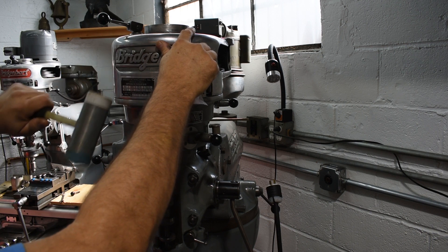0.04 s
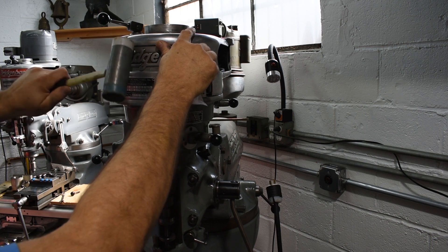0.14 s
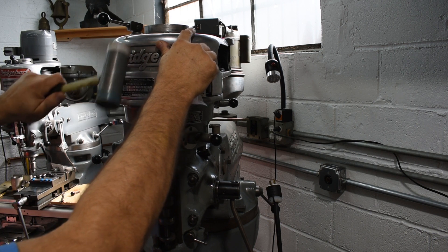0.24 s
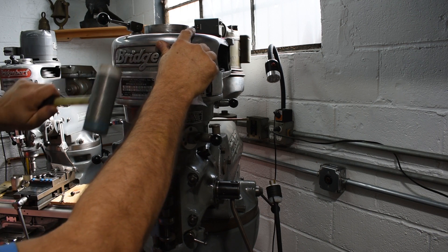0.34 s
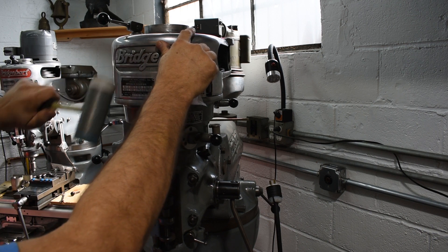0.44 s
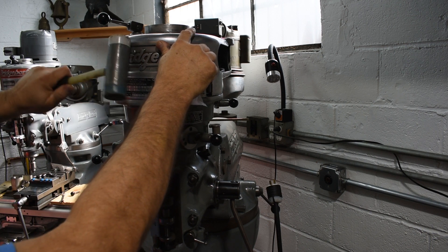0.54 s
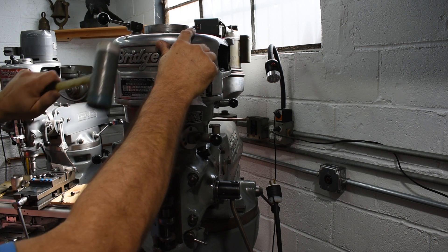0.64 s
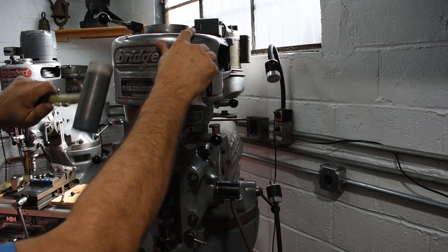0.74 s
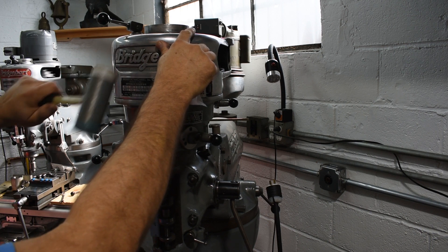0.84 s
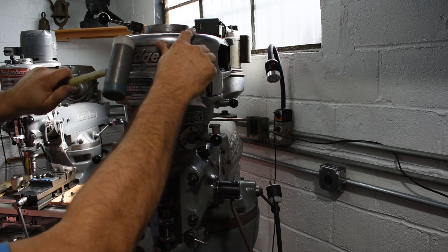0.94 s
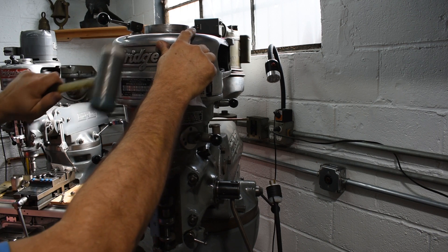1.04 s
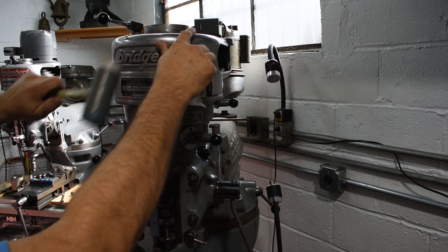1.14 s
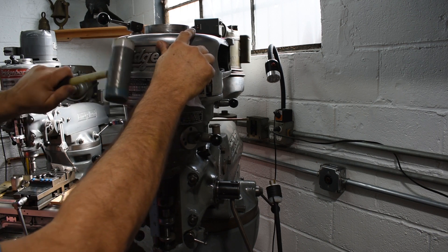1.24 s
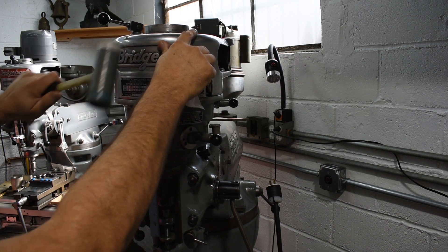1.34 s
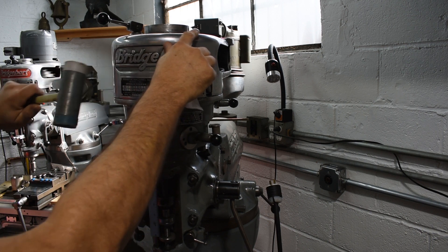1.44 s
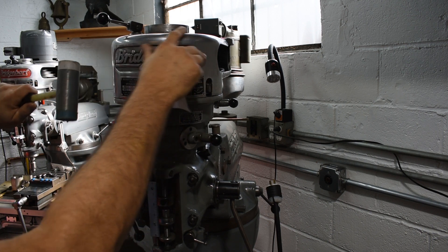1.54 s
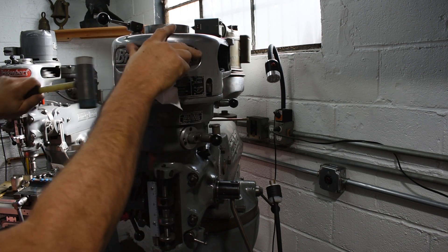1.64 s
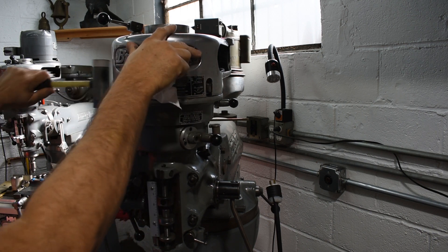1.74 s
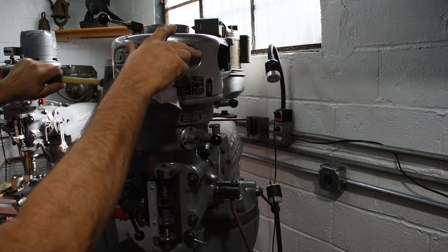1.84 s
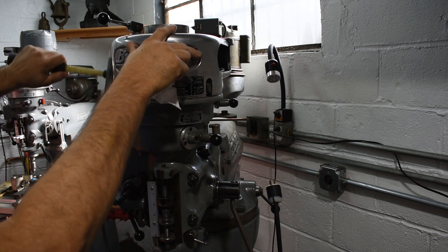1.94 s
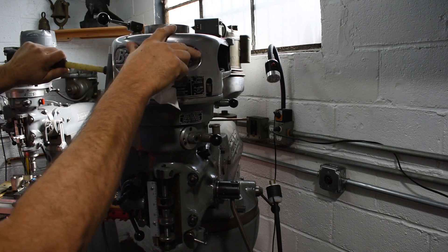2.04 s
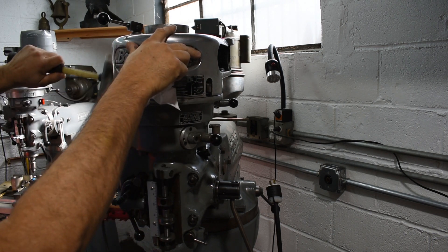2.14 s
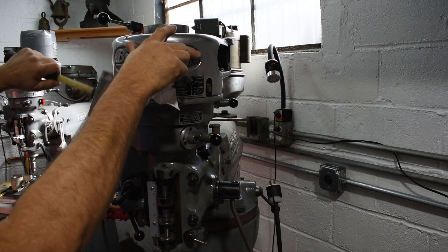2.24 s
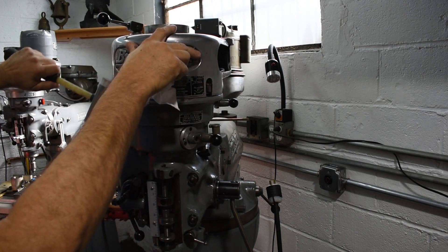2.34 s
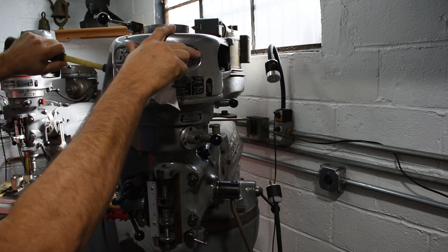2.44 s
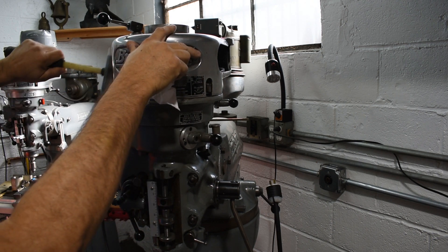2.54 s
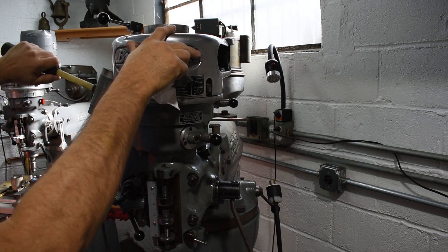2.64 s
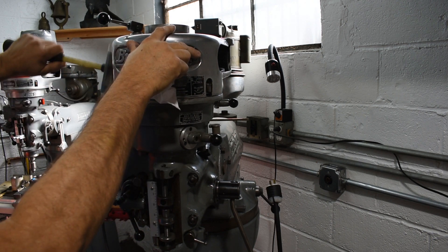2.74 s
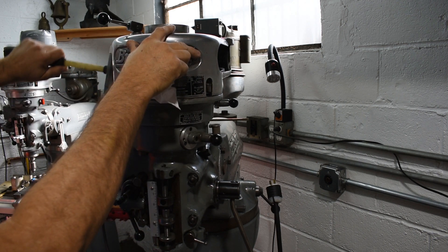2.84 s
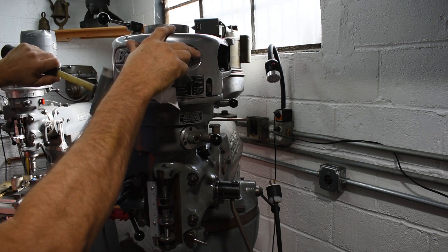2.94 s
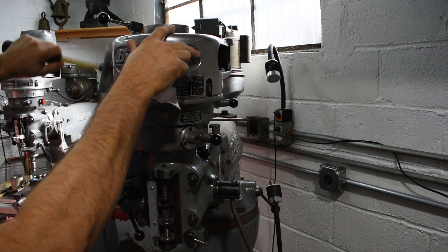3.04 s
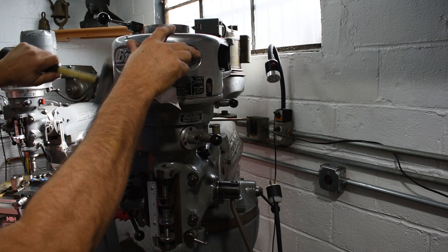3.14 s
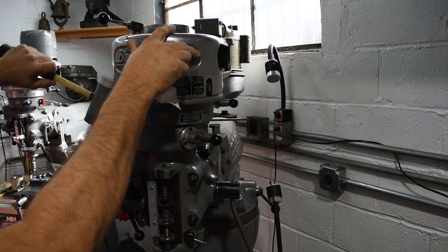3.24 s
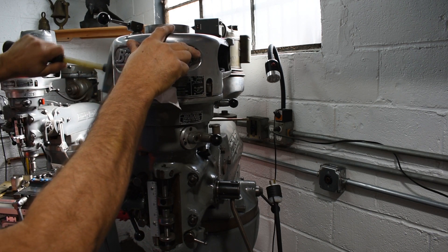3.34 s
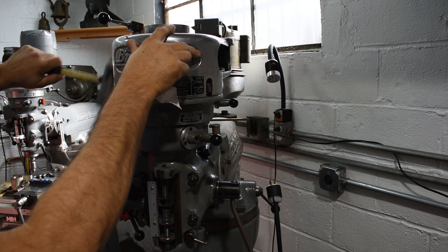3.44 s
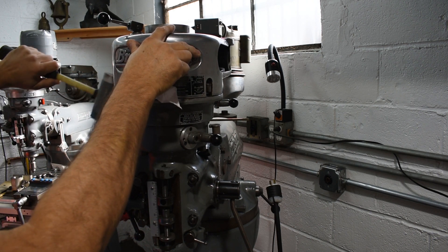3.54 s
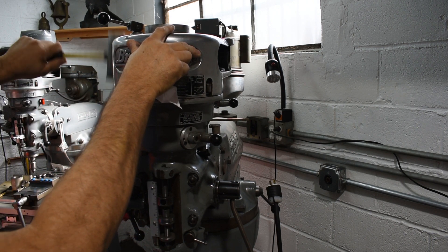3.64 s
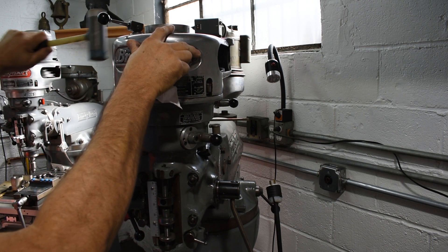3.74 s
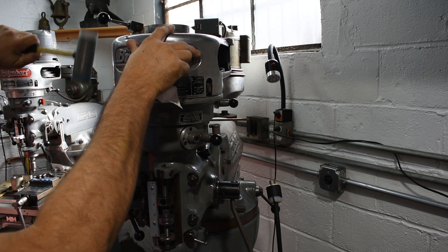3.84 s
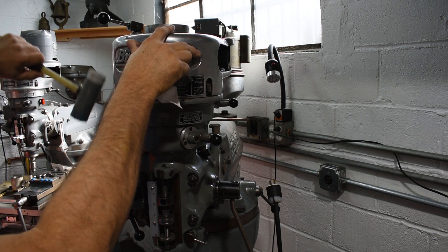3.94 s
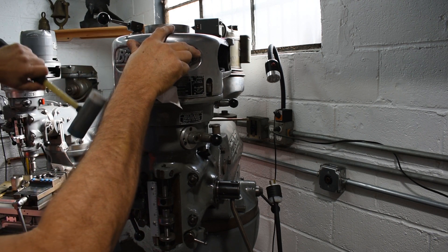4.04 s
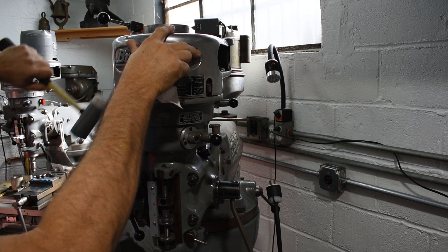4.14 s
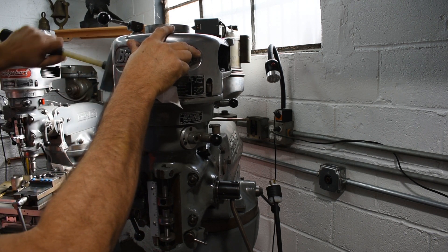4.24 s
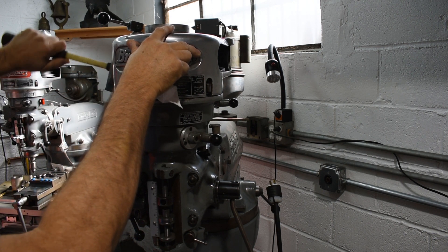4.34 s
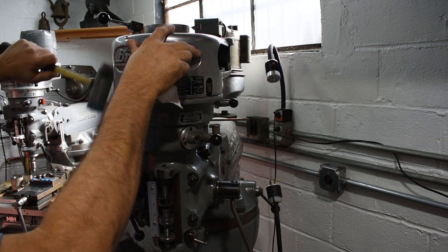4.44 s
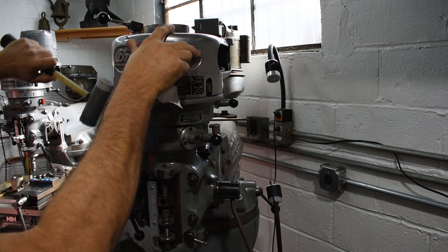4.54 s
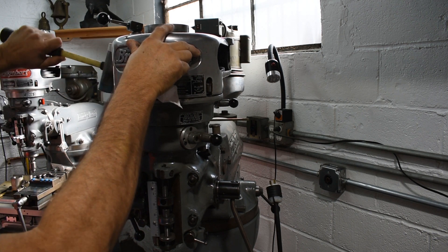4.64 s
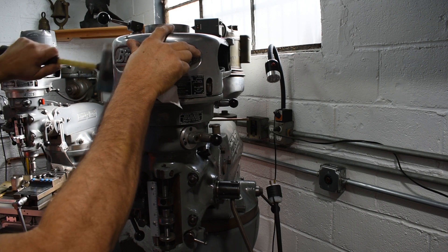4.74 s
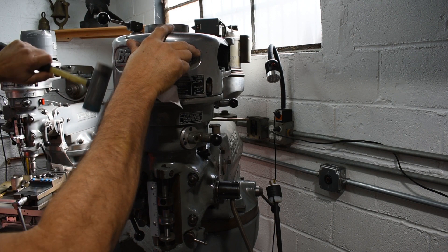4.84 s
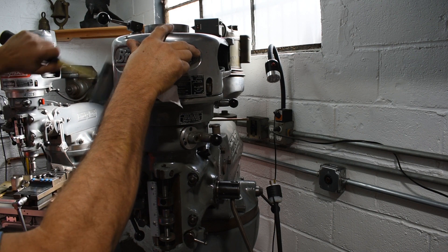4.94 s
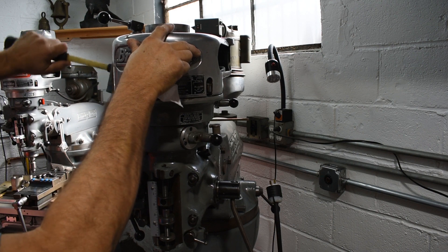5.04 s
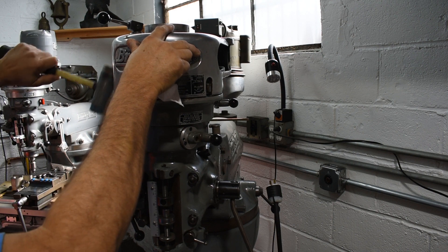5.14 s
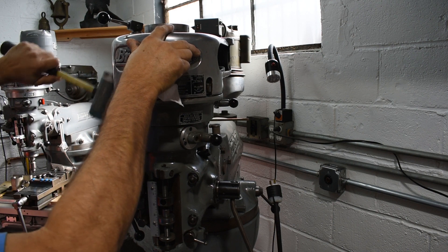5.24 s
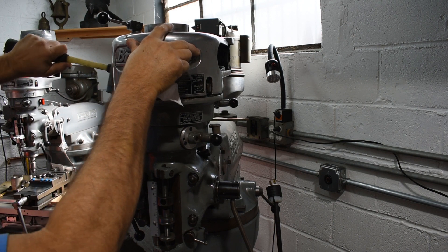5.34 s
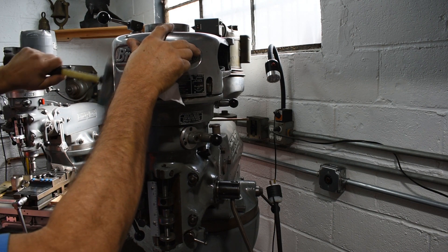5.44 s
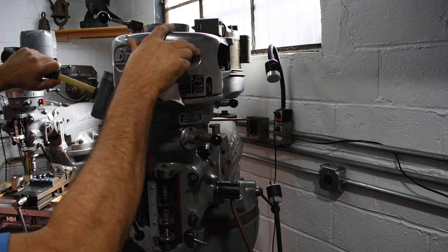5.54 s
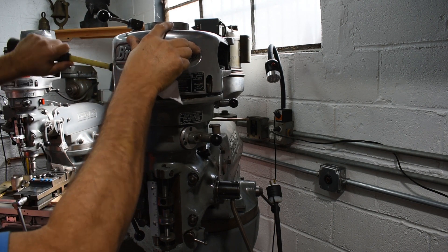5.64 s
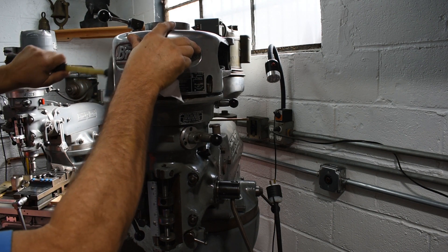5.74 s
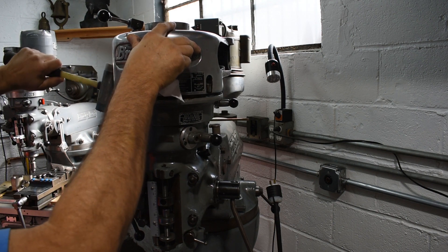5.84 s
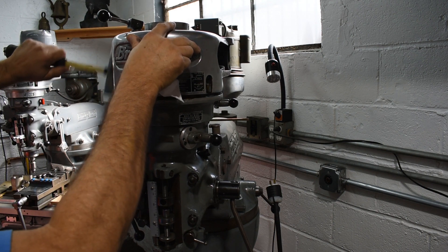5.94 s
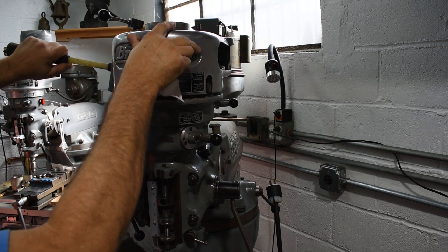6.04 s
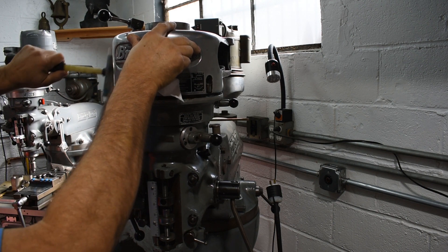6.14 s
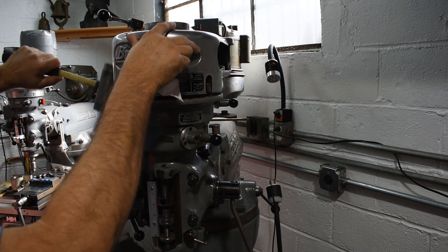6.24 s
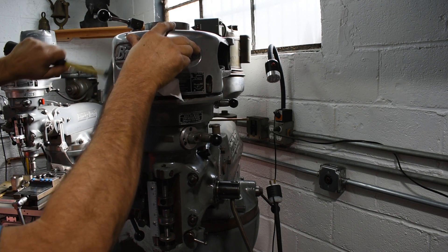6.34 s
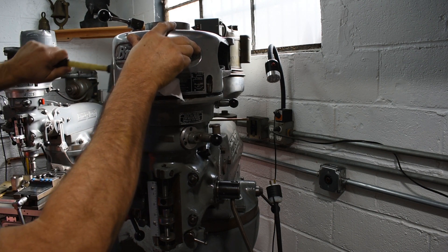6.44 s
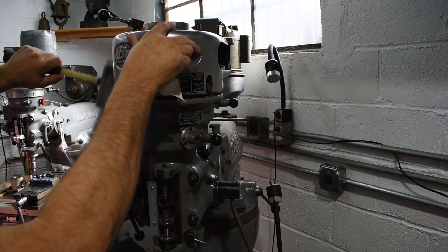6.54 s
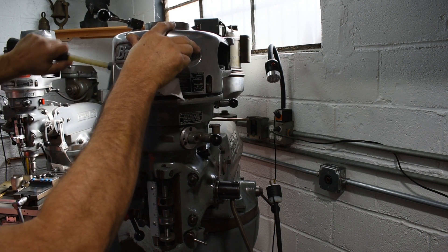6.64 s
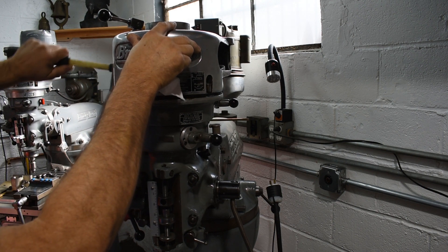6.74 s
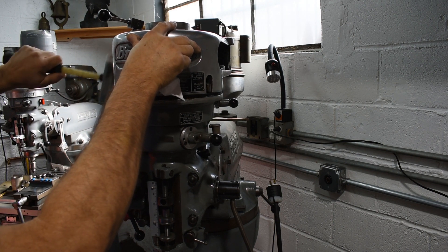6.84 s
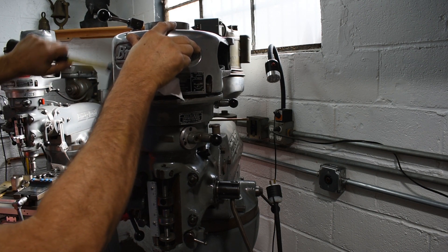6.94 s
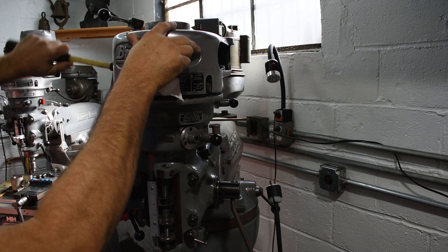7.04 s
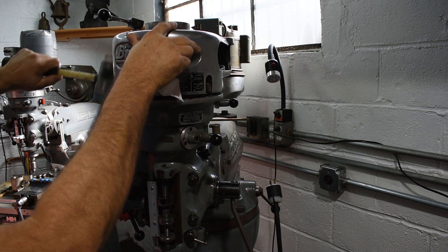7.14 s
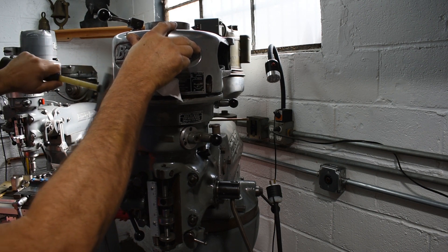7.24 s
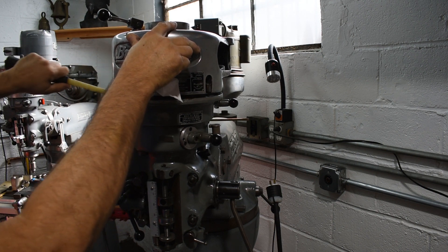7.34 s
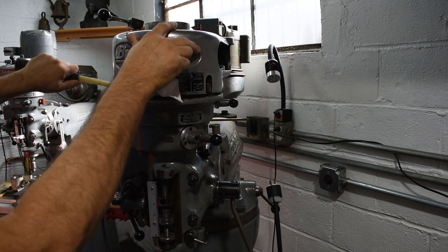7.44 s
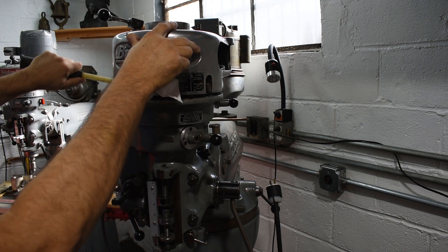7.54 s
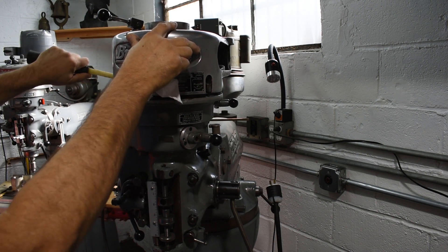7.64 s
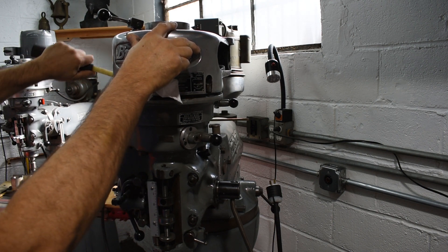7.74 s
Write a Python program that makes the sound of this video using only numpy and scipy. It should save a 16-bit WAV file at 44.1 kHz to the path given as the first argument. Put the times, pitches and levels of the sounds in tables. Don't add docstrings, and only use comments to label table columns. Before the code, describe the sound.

A rubber mallet strikes a loose cast-metal machine housing about eighteen times, with rattling double knocks growing harder and more metallic in a small workshop.

```python
import sys
import numpy as np
from scipy import signal
from scipy.io import wavfile
from scipy.ndimage import uniform_filter1d

SR = 44100
rng = np.random.default_rng(int(sys.argv[2]) if len(sys.argv) > 2 else 0)


def dump(signal):
    limited = np.clip(np.atleast_2d(signal).T, -1, 1)
    pcm = np.round(limited * 32767).astype(np.int16)
    wavfile.write(sys.argv[1], SR, pcm)


def nominal_scale(level):
    x = np.asarray(level, float) / 20
    return 10 ** x


N = 343980


def rms_one(x):
    return x / np.sqrt(np.mean(x ** 2) + 1e-20)


def at_hz(points, hz):
    table_hz, values = np.array(points).T
    return np.interp(np.log(hz), np.log(table_hz), values)


def filtered(x, order, hz, kind):
    return signal.sosfilt(signal.butter(order, hz, kind, fs=SR, output="sos"), x)


def band(x, low_hz, high_hz):
    return filtered(x, 2, [low_hz, min(high_hz, 0.45 * SR)], "band")


def ring(force, hz, t60):
    r, w = nominal_scale(-60 / (t60 * SR)), 2 * np.pi * hz / SR
    return signal.lfilter([0, np.sin(w)], [1, -2 * r * np.cos(w), r * r], force + 1e-18)


def plate(strikes, modes):
    clicks = np.zeros(N)
    for s, level_db in strikes:
        clicks[round(s * SR)] = nominal_scale(level_db)
    rings = sum(nominal_scale(level_db) * ring(clicks, hz, t60) for hz, level_db, t60 in modes)
    return band(rings, modes[0][0] / 1.69, modes[-1][0] * 1.19)


def drift(rate):
    r = np.exp(-80 * np.pi * rate / SR)
    slow = signal.lfilter([1], [1, -2 * r, r * r], rng.standard_normal(N // 40 + 2002))[2000:]
    return np.interp(np.arange(N) / 40, np.arange(len(slow)), rms_one(slow))


# [f/Hz, side level re mid/dB]
WIDTH = [(60, -22), (150, -26.5), (380, -24), (950, -22), (2380, -17), (5980, -12), (15000, -1.5)]


def stereo_bands(size, shape, extra_width_db):
    out = 0
    edges = 22 * 2 ** np.arange(0, 9.6, 0.5)
    white = rng.standard_normal((2, 2, size))
    for k, (low, high) in enumerate(zip(edges, edges[1:])):
        mid, side = band(white[k % 2], low, high)
        hz = np.sqrt(low * high)
        side = nominal_scale(at_hz(WIDTH, hz) + extra_width_db) * side
        out = out + shape(hz) * (mid + side * [[1], [-1]])
    return out


# [f/Hz, level per Hz/dB]
HUSH = [(55, -1.5), (90, -11), (150, 2), (300, -4), (1900, -10.5), (4000, -21.5), (8000, -34.5),
        (14000, -58)]
# [f/Hz, width/Hz, level/dB]
HUM = [(58, 12, -77), (144.7, 6.2, -63.5), (212.4, 5.5, -70), (357, 6, -64)]


def background():
    hush = stereo_bands(N, lambda hz: nominal_scale(at_hz(HUSH, hz) + drift(2.5)), extra_width_db=10.5)
    white = rng.standard_normal(N)
    tones = 0
    for hz, width, level_db in HUM:
        tones = tones + nominal_scale(level_db + 1.1 * drift(1.0)) * rms_one(ring(white, hz, 2.4 / width))
    return nominal_scale(-52.5) * rms_one(hush) + tones


# [t/s, knock level/dB, column thud re knock/dB, pin ring re knock/dB]
TAPS = [(0.194, -13, -8.5, -23), (0.5831, -11, -12.5, -17.5), (0.9575, -11.5, -13.5, -20.5),
        (1.2729, -13.5, -4, -22), (1.966, -3, -31, -60), (2.5016, -7, -11.5, -17.5),
        (2.824, -9.5, -10, -15.5), (3.1195, -8.5, -12, -14.5), (3.4092, -8, -18, -25.5),
        (4.3245, -6, -16, -25.5), (4.7194, -5, -18, -21), (5.0561, -1, -19, -21.5), (5.3888, -1, -37, -34),
        (5.7017, 1.5, -25.5, -47), (6.0591, -5.5, -22.5, -55), (6.4302, -3, -19, -46),
        (6.7433, -1.5, -22.5, -36), (7.0404, 2, -33, -51.5)]
# [t/s, knock level/dB]
REBOUNDS = [(0.2172, -16.5), (0.608, -10), (0.98, -15.5), (1.3093, -25), (2.0172, -13.5), (2.513, -12),
            (2.8485, -15.5), (3.148, -16), (3.421, -11), (3.4554, -7), (4.336, -6.5), (4.737, -7.5),
            (5.106, -4.5), (5.4389, -3.5), (5.7504, -6.5), (6.1, -18), (6.47, -16), (6.787, -3.5),
            (7.0902, -3), (7.1296, -12.5)]
# [thud/dB, body/dB, clank/dB, pin/dB]
REBOUND_MORE_DB = [1.5, -2.5, 2.5, 6]
# [t/s, knock level/dB, lever level/dB]
SWINGS = [
    (2.4574, -46, -51),
    (3.3715, -22, -50),
    (3.651, -27.5, -50),
    (3.69, -41, -47.5),
    (4.658, -18.5, -35),
    (5.382, -8, -47),
    (6.0453, -16, -37),
    (6.7143, -12, -15),
]
# [thud/dB, body/dB, clank/dB, pin/dB]
SWING_DB = [-13.5, -8.5, -15.5, -37]


def blows():
    s, knock_db, thud, pin_db = np.transpose(TAPS)
    boom = -3.5 + 0.26 * thud
    clank = np.minimum(-18.5 - 0.3 * thud, -10.5)
    colour = np.c_[thud, boom, clank, pin_db]
    back = np.array(REBOUNDS)
    back_colour = colour[np.searchsorted(s, back[:, 0]) - 1] + REBOUND_MORE_DB
    settle = back + [0.0441, -14.5]
    swings = np.array(SWINGS)[:, :2]
    rows = np.r_[np.c_[s, knock_db, colour],
                 np.c_[back, back_colour],
                 np.c_[settle, back_colour],
                 np.c_[swings, np.tile(SWING_DB, (len(swings), 1))]]
    return rows[np.argsort(rows[:, 0])]


SHUDDER_RISE_S, SHUDDER_FALL_S = 0.0052, 0.015


def shudder(times, levels_db):
    t = np.arange(round(0.12 * SR)) / SR
    shape = (1 - np.exp(-t / SHUDDER_RISE_S)) * np.exp(-t / SHUDDER_FALL_S)
    marks = np.zeros(N)
    lead_s = 0.0025
    marks[np.round((times - lead_s) * SR).astype(int)] = nominal_scale(levels_db)
    return signal.oaconvolve(marks, shape / np.sqrt(np.sum(shape ** 2)))[:N]


def part(levels_db, modes, rattle, spread_db):
    times = blows()[:, 0]
    latest = np.clip(np.searchsorted(times * SR, np.arange(N)) - 1, 0, None)
    grains = rng.standard_normal(N) * nominal_scale(3.1 * np.minimum(rng.exponential(1, N), 5))
    force = shudder(times, levels_db) * rms_one(grains)
    luck = rng.standard_normal((len(times), len(modes)))
    low_hz, high_hz, rattle_db = rattle
    rattle_gain = nominal_scale(rattle_db) * np.sqrt(SR * SR * SHUDDER_FALL_S / (high_hz - low_hz))
    out = rattle_gain * band(force, low_hz, high_hz)
    for k, (hz, level_db, t60) in enumerate(modes):
        out += ring(force * nominal_scale(level_db + spread_db * luck[latest, k]), hz, t60)
    return band(out, modes[0][0] / 1.76, modes[-1][0] * 1.244) / np.sqrt(len(modes))


# [f/Hz, level/dB, t60/s]
CASTING = [(886, 2.5, 0.034), (1007, -13, 0.061), (1054.5, -25, .08), (1240, -25, 0.18),
           (1300, -0.5, 0.184), (1388, -1, 0.09), (1482.5, 2, 0.039), (1562.3, 0.5, 0.075),
           (1635, -9, 0.18), (1749, -6.5, 0.029), (2027, -16.5, 0.058)]
# [low f/Hz, high f/Hz, level/dB]
CASTING_RATTLE = (826, 2590, 0)


def casting(knock_db):
    return part(knock_db - 3.5, CASTING, CASTING_RATTLE, spread_db=2.0)


# [f/Hz, level/dB, t60/s]
COLUMN = [(105, -9, .1), (135, -3, .16), (158, 2, .17), (200, -6, .1), (255, -5, .1)]
# [low f/Hz, high f/Hz, level/dB]
COLUMN_RATTLE = (94, 246, -5.5)


def column(thud_db):
    return part(thud_db + 0.5, COLUMN, COLUMN_RATTLE, spread_db=2.0)


# [f/Hz, level/dB, t60/s]
BODY = [(354, -2, 0.02), (428.2, -22.5, 0.13), (477, 1.5, 0.15), (521.5, 5.5, 0.0749), (587, 6.5, 0.0117),
        (679, 4, 0.092), (750.6, -1.5, 0.2032), (818, -5.5, 0.0751)]
# [low f/Hz, high f/Hz, level/dB]
BODY_RATTLE = (283, 1064, 7.43)


def body(boom_db):
    return part(boom_db - 3.5, BODY, BODY_RATTLE, spread_db=2.0)


# [f/Hz, level/dB, t60/s]
COVER = [(2608, -1.5, 0.085), (2780, -11, 0.098), (3284, -2.5, 0.08), (3440, -0.5, 0.08), (3920, -4, 0.04),
         (4042, -6, 0.052), (4420, -8.5, 0.034), (4430, -20, 0.06), (5150, -21.5, 0.062),
         (5900, -13, 0.033), (5950, -13, 0.045), (7240, -31, .03), (8500, -34, .02)]
# [low f/Hz, high f/Hz, level/dB]
COVER_RATTLE = (2700, 4840, -4)


def cover(clank_db):
    return part(clank_db - 0.5, COVER, COVER_RATTLE, spread_db=0.5)


# [f/Hz, level/dB, t60/s]
PIN = [(7530, -7, 0.1), (9190, -1.5, 0.13), (9190, 1, .14), (9230, -5, .08), (10340, -14, .08),
       (10970, -7.5, 0.14), (11040, -14, 0.077), (12870, -14, .14), (14890, -14.5, .13)]
# [low f/Hz, high f/Hz, level/dB]
PIN_RATTLE = (5000, 11000, -9)


def pin(ring_db):
    thrown = [(s + 0.016, knock_db + pin_db - 10) for s, knock_db, _, pin_db in TAPS]
    return part(ring_db - 8.0, PIN, PIN_RATTLE, spread_db=2.5) + plate(thrown, PIN)


def machine():
    knock_db, thud, boom, clank, pin_db = blows()[:, 1:].T
    low = column(knock_db + thud) + body(knock_db + boom)
    high = cover(knock_db + clank) + pin(knock_db + pin_db)
    return low + casting(knock_db) + high


# [t/s, level/dB]
HOLLOW_BLOWS = [(0.2, -28), (0.606, -23.5), (2.502, -17.5), (2.83, -24), (3.67, -39.5), (4.327, -27),
                (4.35, -15.5), (4.725, -22), (5.44, -22.5), (6.75, -20.5), (7.045, -23)]
# [f/Hz, level/dB, t60/s]
HOLLOW = [(483.4, -2.5, 0.19), (522, 4, 0.25), (588, 2, 0.077)]


def hollow():
    return plate(HOLLOW_BLOWS, HOLLOW)


# [f/Hz, t60/s]
SHOP_T60 = [(80, 0.26), (210, 0.37), (560, 0.36), (1470, 0.34), (3880, 0.38), (10200, 0.27)]


def shop(x):
    t = np.arange(round(0.45 * SR)) / SR
    times = blows()[:, 0]
    starts = times[np.diff(times, prepend=0) > 0.15] - 0.01
    tail_turn = np.searchsorted(starts * SR, np.arange(N)) % 4
    out = 0
    for k in range(4):
        tail = stereo_bands(len(t), lambda hz: nominal_scale(-60 * t / at_hz(SHOP_T60, hz)), extra_width_db=1.5)
        tail = tail * (1 - np.exp(-t / 0.0015))
        tail = tail / np.sqrt(np.sum(tail ** 2) / 2)
        out = out + signal.fftconvolve(x[None] * (tail_turn == k), tail, axes=1)[:, :N]
    return nominal_scale(-2) * out


# [t/s, length/s, level/dB]
BRUSHES = [
    (1.633, 0.25, -61),
    (4.024, 0.05, -56.5),
    (7.69, 0.043, -78),
]


def brushes():
    t = np.arange(N) / SR
    envelope = sum(nominal_scale(level_db) * np.exp(-((t - s) / length) ** 2 * 4) for s, length, level_db in BRUSHES)
    return envelope * rms_one(band(rng.standard_normal(N), 1200, 4100))


# [t/s, level/dB]
STOPS = [(1.9645, -12.5), (2.02, -21.5), (3.457, -14.5), (5.057, -21), (5.108, -16.5), (5.388, -14),
         (5.6993, -11.5), (5.75, -23), (6.061, -15.5), (6.79, -20), (7.042, -23), (7.098, -18)]
# [f/Hz, level/dB, t60/s]
SPINDLE = [(1088, 2, 0.056), (1425, 0, 0.071), (2755, -13.5, 0.17), (3317, 1.5, 0.058), (3290, -5.5, 0.082),
           (3510, -2, 0.14), (4570, -15.5, 0.11)]


def stops():
    return plate(STOPS, SPINDLE)


# [f/Hz, level/dB, t60/s]
LEVER = [(1300, 0, .06), (2590, -3.5, 0.055), (2680, -7, 0.095), (4060, -6, 0.094)]


def lever():
    return plate([(s, lever_db) for s, _, lever_db in SWINGS], LEVER)


# [t/s, level/dB]
SWAYS = [
    (2.55, -60),
    (4.4, -49),
    (7.1, -44.5),
]


def sway():
    return plate(SWAYS, [(57.5, 0, 1.5)])


# [t/s, level/dB]
COLLAR_BLOWS = [
    (4.338, -44),
    (5.062, -18),
    (5.70, -22),
    (5.775, -22.5),
    (5.82, -28),
]
# [f/Hz, level/dB, t60/s]
COLLAR = [(4460, -4, 0.12), (4550, -11.5, 0.057)]


def collar():
    return plate(COLLAR_BLOWS, COLLAR)


# [t/s, level/dB]
GUARD_BLOWS = [
    (6.062, -26.5),
    (6.434, -23),
]
# [f/Hz, level/dB, t60/s]
GUARD = [(915, -1, 0.34), (1340, -6, 0.22), (1622, 1, 0.39)]


def guard():
    return plate(GUARD_BLOWS, GUARD)


# [t/s, level/dB]
PLATE_BLOWS = [
    (6.748, -29),
    (7.045, -14.5),
]
# [f/Hz, level/dB, t60/s]
PLATE = [(765, -32, 1.5), (915, -21, 0.73), (1069, -22.5, 1.76), (1562, -1, 0.6), (3460, -20, 0.58)]


def free_plate():
    return plate(PLATE_BLOWS, PLATE)


def scene():
    struck = machine() + hollow() + stops() + lever() + collar()
    valley_hz, valley_width_hz = 2225.8, 590
    valley = band(struck, valley_hz - valley_width_hz / 2, valley_hz + valley_width_hz / 2)
    struck = struck - 0.47 * valley
    near = struck + brushes() + guard() + free_plate()
    near = filtered(near, 2, 90.0, "high")
    mix = near + shop(near) + sway() + background()
    left_db = -1.5
    return mix * nominal_scale(np.array([[left_db / 2], [-left_db / 2]]))


def limiter(x):
    threshold_db, slope, lag_s, release_db_s = -4.5, 0.51, 0.013, 282
    over_db = np.maximum(20 * np.log10(np.max(np.abs(x), axis=0) + 1e-9) - threshold_db, 0)
    ramp = release_db_s * np.arange(N) / SR
    held_db = np.maximum.accumulate(over_db + ramp) - ramp
    smooth_db = uniform_filter1d(held_db, size=300)
    duck_db = np.interp(np.arange(N) - lag_s * SR, np.arange(N), smooth_db)
    return x * nominal_scale(-slope * duck_db)


def top_cut(x):
    return signal.sosfilt(signal.butter(12, 15890, fs=SR, output="sos"), x)


def record(dry):
    x = filtered(dry, 1, 40.0, "high")
    x = np.clip(1.367 * np.tanh(limiter(x) / 1.422), -1, 1)
    x = signal.sosfilt(signal.cheby2(12, 60, 16100, fs=SR, output="sos"), x)
    return top_cut(x)


dry = scene()
out = record(dry)
dump(out)
```